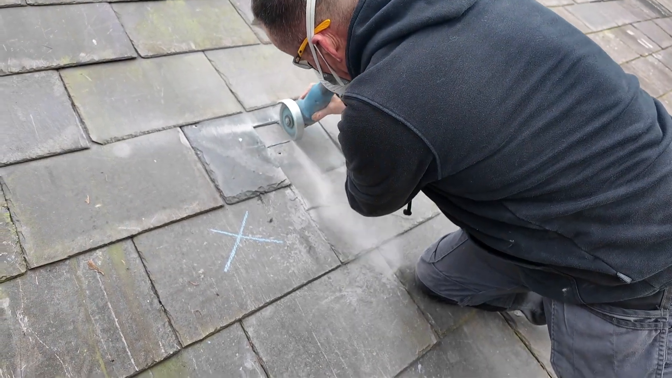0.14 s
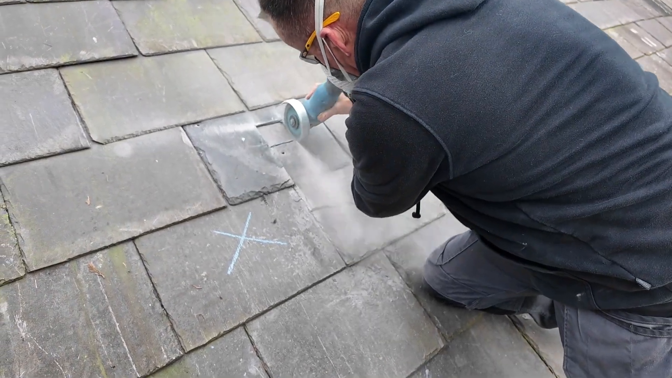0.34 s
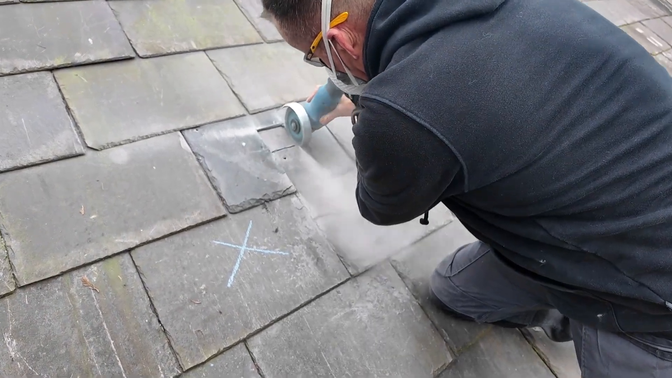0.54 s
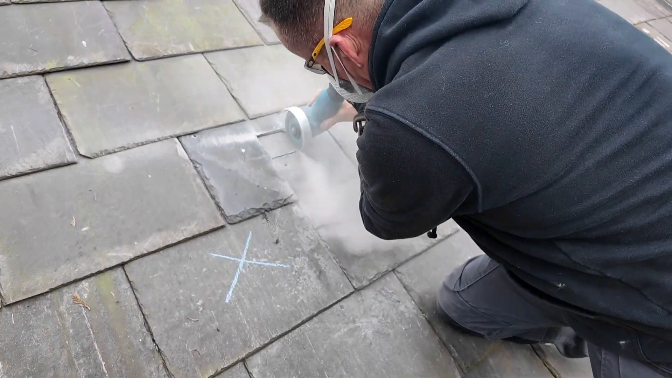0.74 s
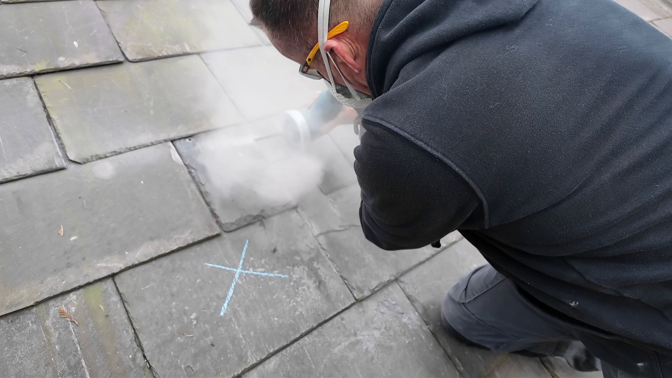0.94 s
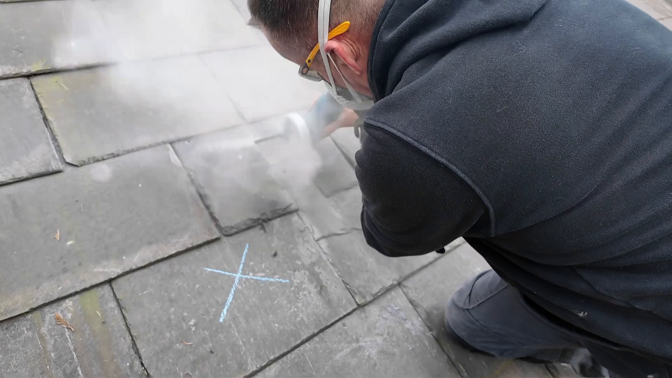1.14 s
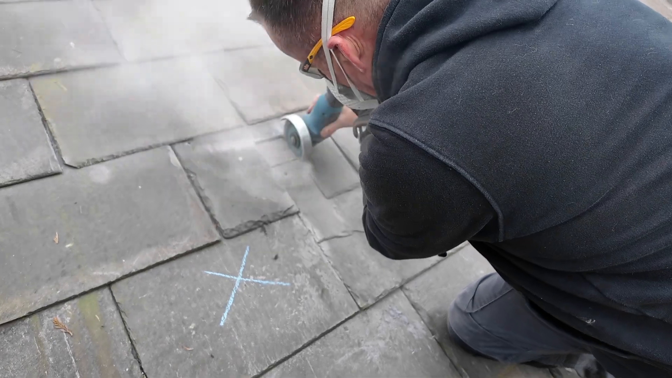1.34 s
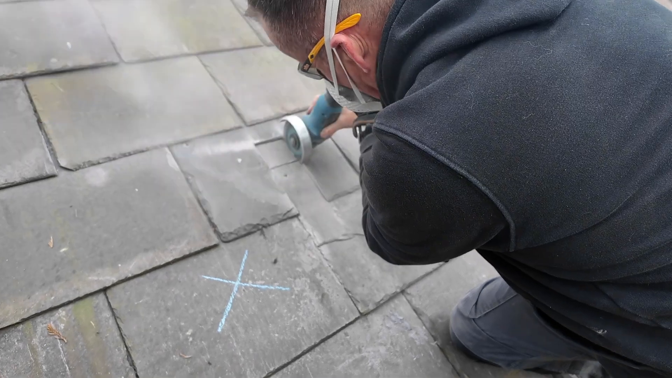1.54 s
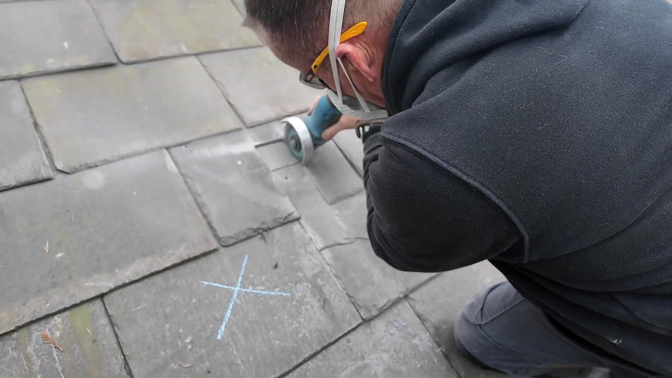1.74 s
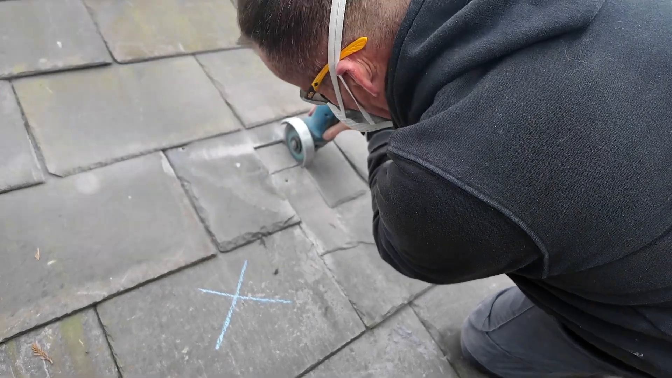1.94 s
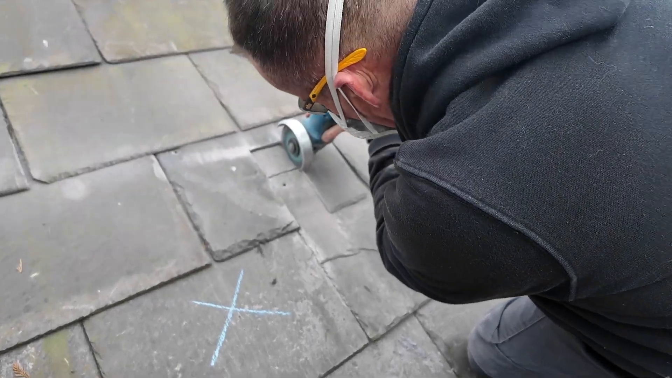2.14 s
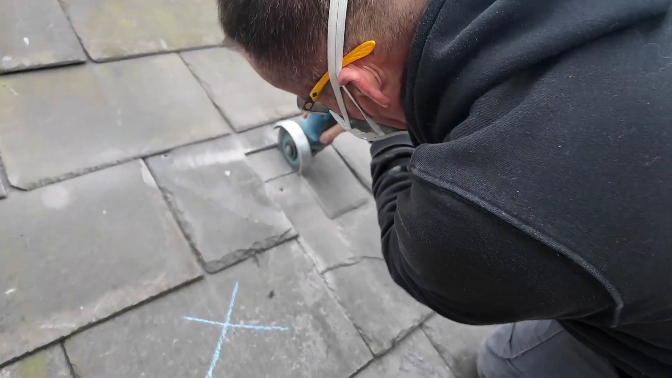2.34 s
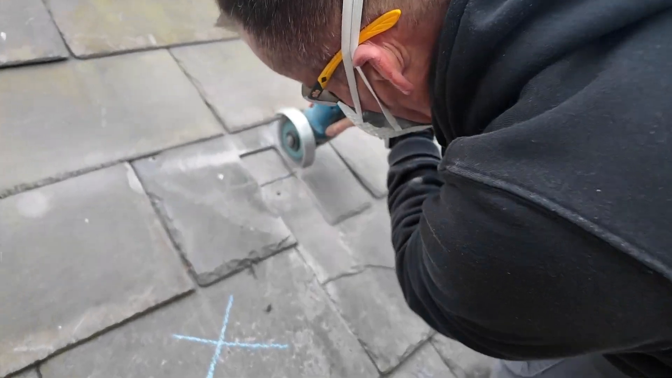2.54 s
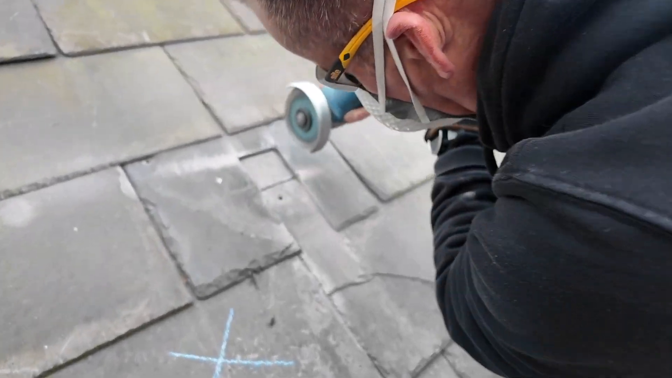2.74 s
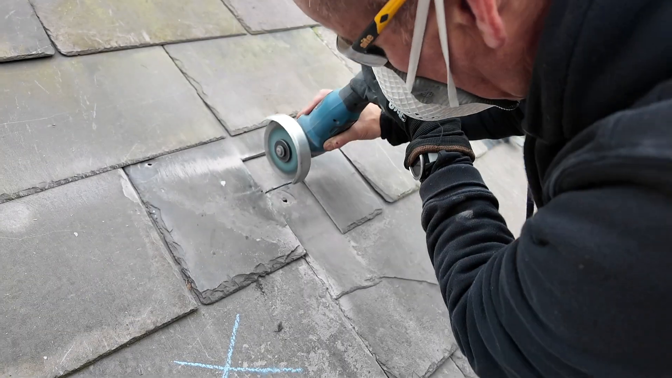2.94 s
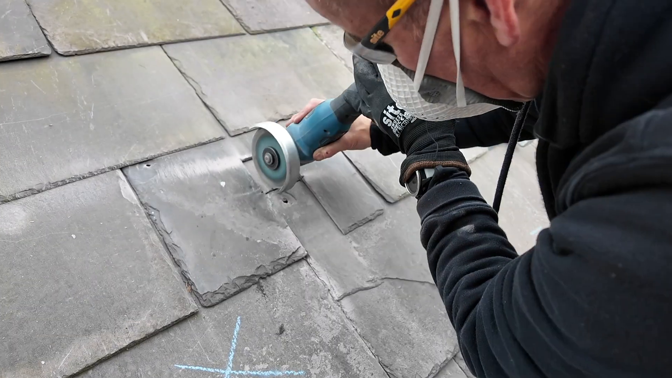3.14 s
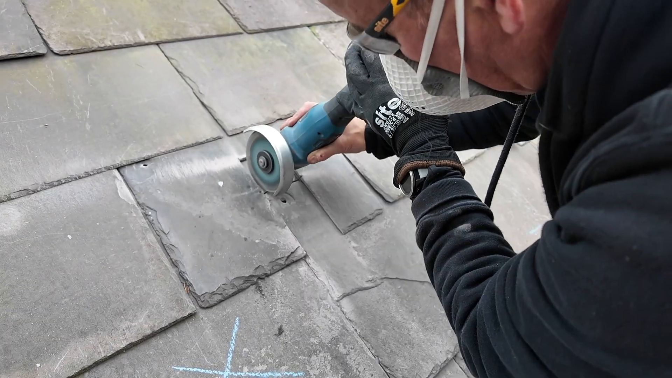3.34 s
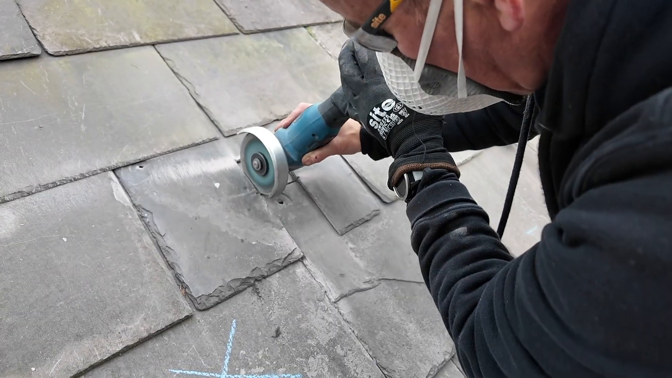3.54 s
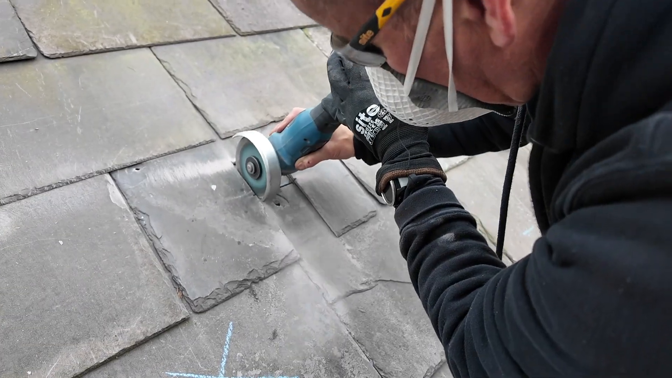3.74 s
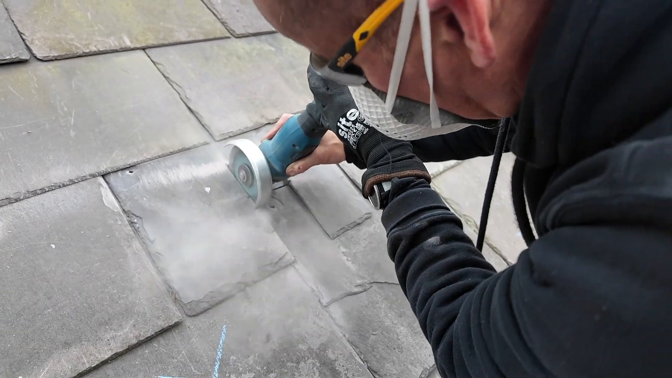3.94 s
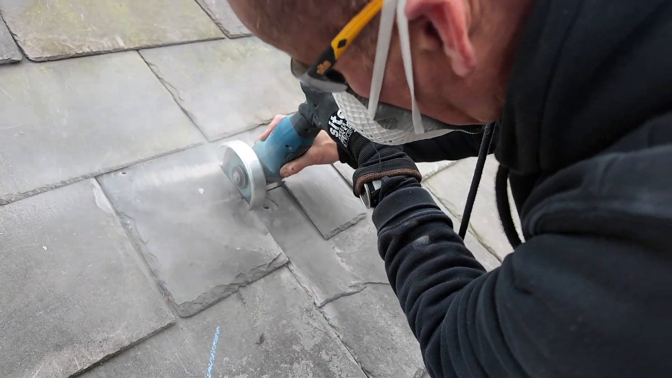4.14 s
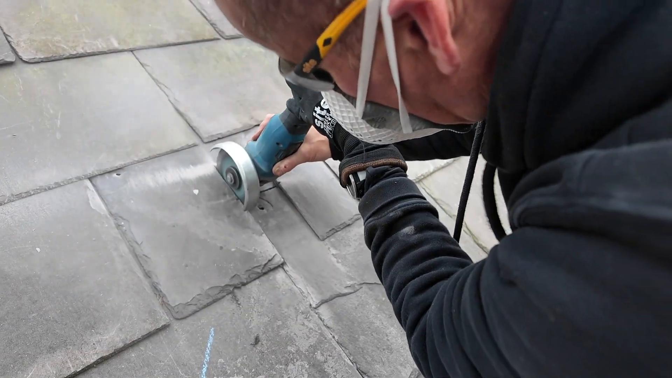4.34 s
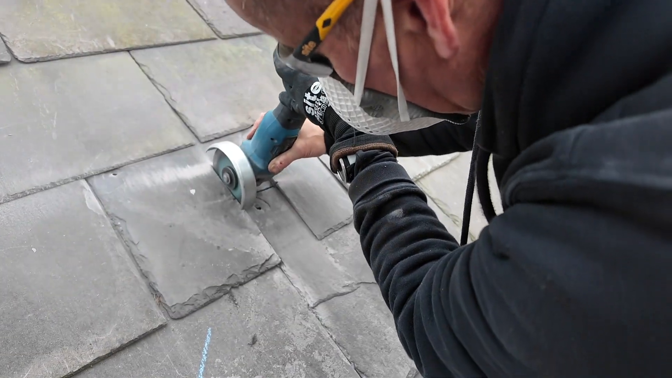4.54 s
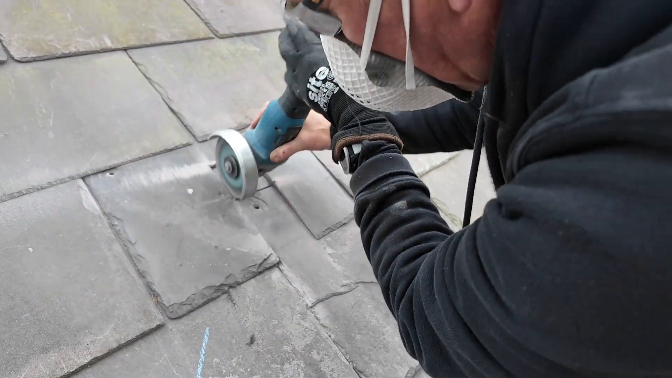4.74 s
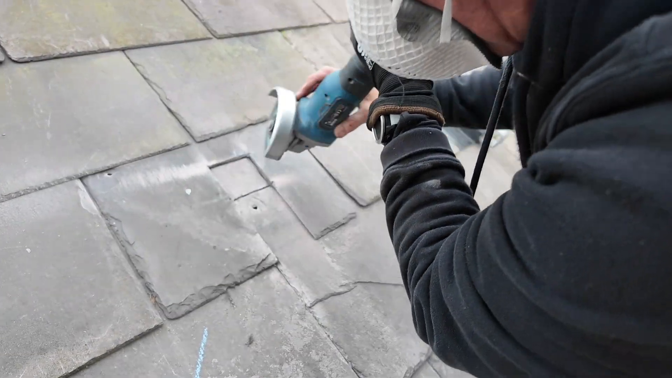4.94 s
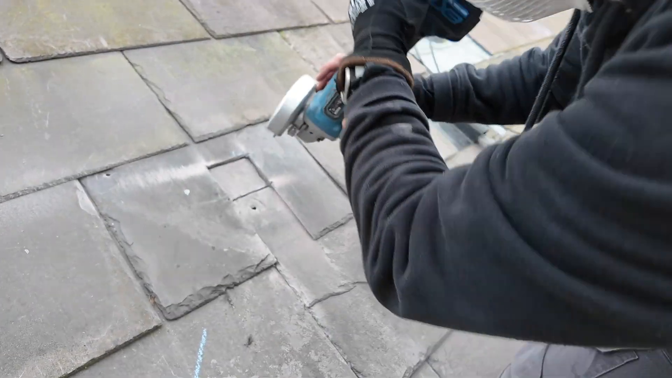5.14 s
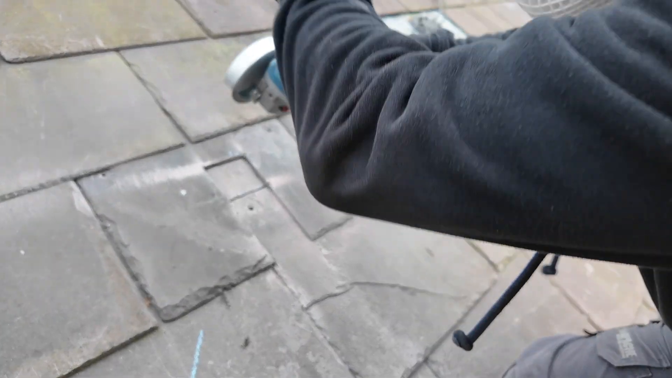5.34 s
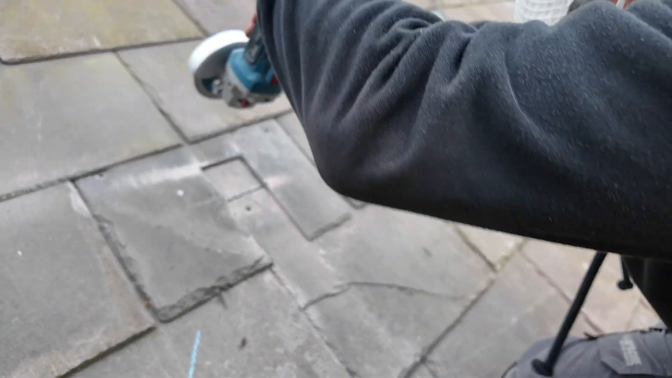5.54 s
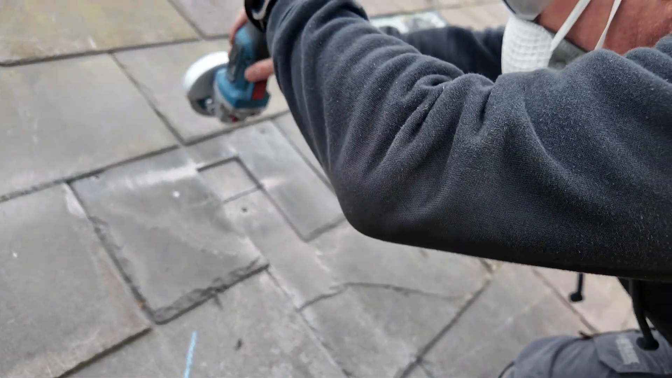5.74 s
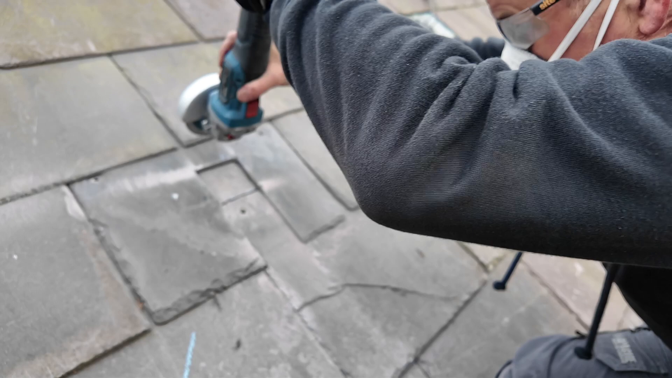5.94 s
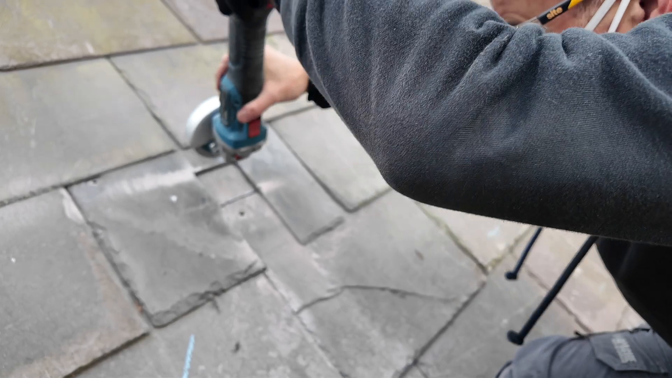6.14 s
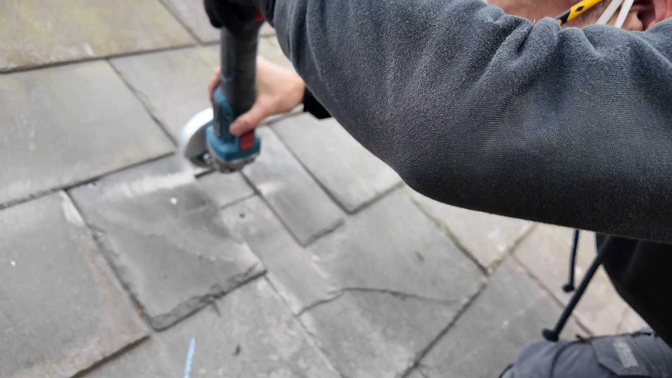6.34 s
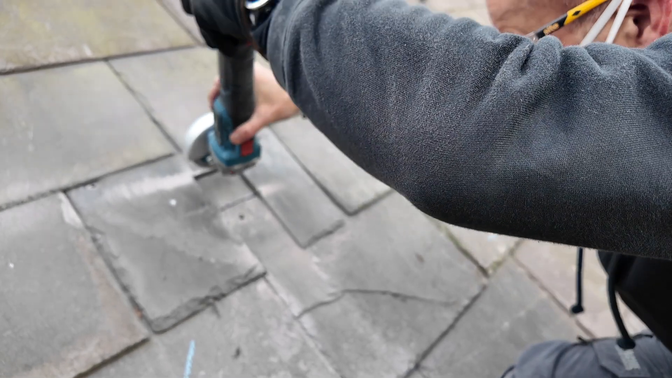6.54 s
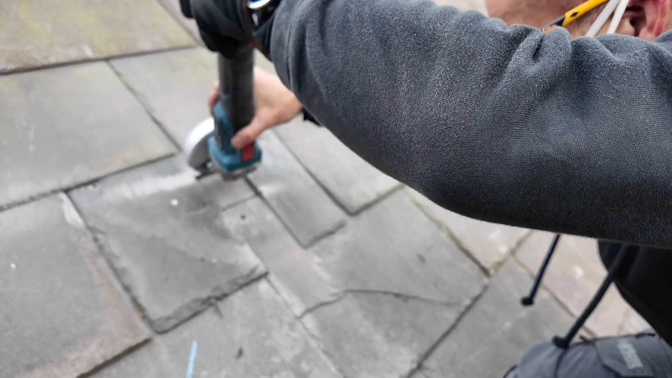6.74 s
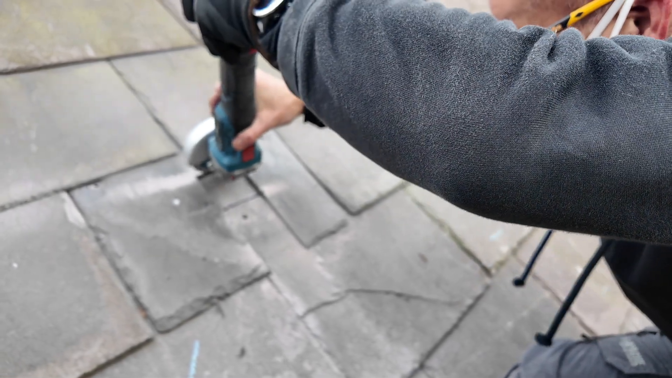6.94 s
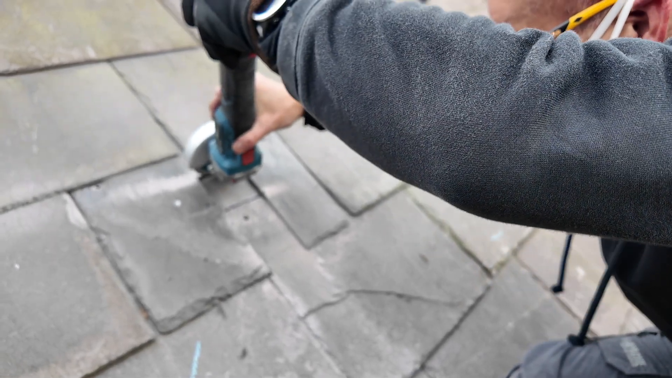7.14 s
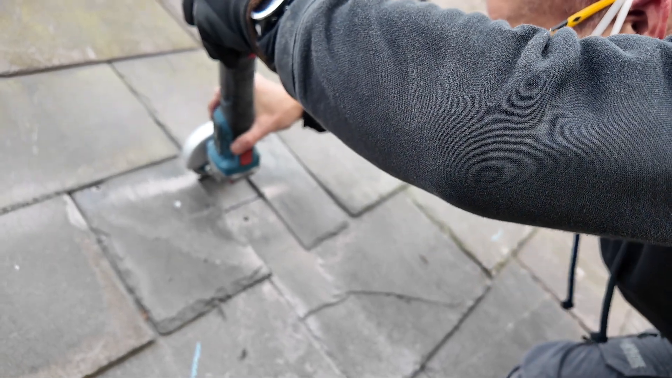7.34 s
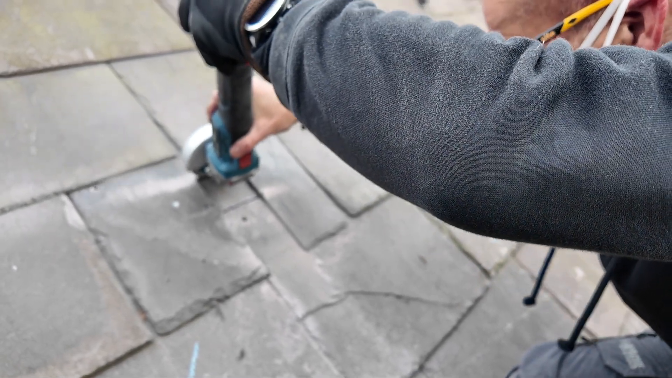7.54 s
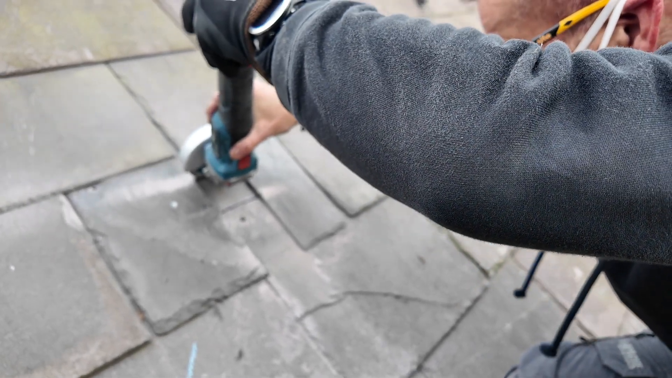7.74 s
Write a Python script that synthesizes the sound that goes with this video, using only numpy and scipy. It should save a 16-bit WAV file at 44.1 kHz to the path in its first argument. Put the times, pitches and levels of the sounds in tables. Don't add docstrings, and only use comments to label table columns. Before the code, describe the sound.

Outdoors on a slate roof, a small angle grinder is already cutting: a loud gritty hiss with metallic ring and a fast buzzing knock that slows as the disc bogs down. It lifts and spins freely with rattling gears, fan air and thin whine, cuts again for about a second, then runs free for longer before bouncing into a third cut. Close camera microphone, dry.

```python
import sys
import numpy as np
from scipy import signal
from scipy.fft import rfft, irfft, next_fast_len
from scipy.io import wavfile
from scipy.ndimage import uniform_filter1d, map_coordinates

SR = 44100
rng = np.random.default_rng(int(sys.argv[2]) if len(sys.argv) > 2 else 0)


def nominal_scale(level):
    x = np.asarray(level, float) / 20
    return 10 ** x


def wav_record(signal):
    frames = np.transpose(np.atleast_2d(signal))
    bounded = np.clip(frames, -1, 1)
    quanta = np.round(bounded * 32767).astype(np.int16)
    wavfile.write(sys.argv[1], SR, quanta)


N = 343539
FREE_HZ = 120.3

# f/Hz, width/Hz, level/dB
DISC_LOW = [(3323, 44, -8), (4244, 108, -3), (4883, 160, -2.5), (5716, 111, 1.5), (6742, 62, 4.5),
            (7510, 59, -6.5)]


def unit(x):
    return x / np.sqrt(np.mean(x ** 2) + 1e-20)


def along(points, hz):
    f, v = np.transpose(points)
    return np.interp(np.log(hz + 1), np.log(f + 1), v)


def curves(rows):
    s, *cols = np.transpose(sorted(map(tuple, rows)))
    return np.array([np.interp(np.arange(N) / SR, s, c) for c in cols])


def wobble(rate):
    knots = rng.standard_normal(int(N * rate / SR) + 4)
    return map_coordinates(knots, [np.arange(N) * rate / SR])


def filtered(x, response):
    m = next_fast_len(N + 8192)
    return irfft(rfft(x, m) * response(np.fft.rfftfreq(m, 1 / SR)), m)[..., :N]


def coloured(x, spectrum):
    return unit(filtered(x, lambda hz: nominal_scale(along(spectrum, hz))))


def wandering(x, depth_db, bins, frames):
    z = signal.stft(x, nperseg=512)[2]
    field = uniform_filter1d(rng.standard_normal(z.shape), size=bins, axis=0)
    field = uniform_filter1d(field, size=frames, axis=1)
    return signal.istft(z * nominal_scale(depth_db * unit(field)), nperseg=512)[1][:N]


def patchy(depth_db):
    return wandering(rng.standard_normal(N), depth_db, bins=6, frames=12)


def drifting(x, depth_db):
    return wandering(x, depth_db, bins=5, frames=25)


def rung(x, modes):
    def bank(f):
        total = 0
        for k, (c, w, db) in enumerate(modes):
            total = total + (-1) ** k * nominal_scale(db) * 1j * f * w / (c * c - f * f + 1j * f * w)
        return total
    return filtered(x, bank) / np.std(filtered(rng.standard_normal(N), bank))


def struck(events, modes):
    out, t = np.zeros(N + SR), np.arange(SR // 2) / SR
    onset = 1 - np.exp(-t / 0.006)
    for s, db in events:
        tail = out[round(s * SR):][:len(t)]
        for hz, g, t60 in modes:
            tail += nominal_scale(db + g - 60 * t / t60) * np.sin(2 * np.pi * hz * t) * onset
    return out[:N]


def tinted(x, rows):
    hz, t, z = signal.stft(x, SR, nperseg=1024, noverlap=768)
    lift = 0
    for a, b, c, w, db in rows:
        peak = db / (1 + (2 * (hz[:, None] - c) / w) ** 2)
        lift = lift + peak * np.clip(np.minimum(t - a, b - t) / 0.017 + .5, 0, 1)
    return signal.istft(z * nominal_scale(lift), SR, nperseg=1024, noverlap=768)[1][:N]


def disc_speed():
    # t/s, f/Hz
    pushes = [
        [(0.0, 113.5), (0.08, 112.2), (0.24, 103.3), (0.4, 106.7), (0.63, 104), (0.77, 101.3), (0.94, 95.64),
         (1.1, 94.35), (1.2, 92.1)],
        [(1.2, 90.46), (1.315, 89.6), (1.41, 98.3), (1.52, 103), (1.71, 111), (1.88, 112.3), (2.05, 105.5),
         (2.13, 107.4)],
        [(2.13, 107), (2.2, 113), (2.37, 111.2), (2.42, 109.7)],
        [(3.7, 120.1), (3.9, 117.1), (3.924, 113.7), (4.03, 109.6), (4.15, 111.6), (4.26, 111), (4.42, 109.5),
         (4.65, 110.7), (4.78, 111.5)],
        [(7.36, 119.9), (7.6, 118.6), (7.66, 118.2), (7.79, 115.2)],
    ]
    spin_up_s = .12
    t, hz = np.arange(N) / SR, np.full(N, FREE_HZ)
    for rows in pushes:
        recovery = np.exp(-np.maximum(t - rows[-1][0], 0) / spin_up_s)
        sag = (FREE_HZ - curves(rows)[0]) * recovery
        hz = np.where(t >= rows[0][0], FREE_HZ - sag, hz)
    return hz


def strokes():
    # from t/s, to t/s, grit level/dB, disc ring level/dB, knock level/dB
    first_cut = [(0, 0.265, -23.5, -28.5, -30.5), (0.229, 0.622, -26.5, -34, -30),
                 (0.627, .72, -24, -29, -30.5), (0.718, 0.993, -23.5, -24.5, -29.5),
                 (1, 1.167, -25.5, -27.5, -29.5), (1.15, 1.448, -24.5, -28.5, -29.5),
                 (1.449, 1.576, -23.5, -27, -32.5), (1.584, 1.72, -26, -30, -38.5),
                 (1.721, 1.793, -24, -24.5, -38), (1.799, 1.911, -26, -31.5, -39.5),
                 (1.897, 2.135, -24, -32, -38.5), (2.134, 2.209, -27.5, -33.5, -49),
                 (2.207, 2.396, -22.5, -30.5, -38.5), (2.39, 2.506, -28, -36.5, -58),
                 (2.513, 2.582, -23.5, -31, -56), (2.58, 2.621, -25, -29.5, -65)]
    later_cuts = [(3.424, 3.441, -17, -42, -27), (3.686, 3.693, -19, -24.5, -60),
                  (3.708, 3.73, -25.5, -35, -41.5), (3.729, 3.784, -33, -39, -50),
                  (3.782, 3.919, -25.5, -26, -43.5), (3.916, 4.025, -20, -28.5, -38.5),
                  (4.015, 4.166, -23.5, -30.5, -37), (4.16, 4.429, -23, -33.5, -36),
                  (4.417, 4.744, -23.5, -30, -36), (4.733, 4.799, -24.5, -27, -42.5),
                  (4.814, 4.859, -21, -26, -48), (7.37, 7.388, -18, -22, -35.5),
                  (7.394, 7.486, -24, -26.5, -46), (7.493, 7.546, -22.5, -26, -45),
                  (7.551, 7.588, -31, -28, -58), (7.614, 7.635, -22.5, -26, -47),
                  (7.636, 7.664, -21, -28, -37.5), (7.671, 7.712, -26, -27, -48),
                  (7.709, 7.778, -23, -26.5, -35)]
    bite_db_per_s, leave_db_per_s = 3000, 1000
    t, db = np.arange(N) / SR, np.full((3, N), -150.)
    for a, b, *levels in first_cut + later_cuts:
        edge = np.maximum(0, np.maximum(bite_db_per_s * (a - t), leave_db_per_s * (t - b)))
        db = np.maximum(db, np.array(levels)[:, None] - edge)
    return nominal_scale(db)


def scrape(turns, repeat):
    textures_per_s = 7
    rim = rng.standard_normal((int(N / SR * textures_per_s) + 3, 401))
    rim[:, -1] = rim[:, 0]
    place = [np.arange(N) / SR * textures_per_s, turns % 1 * 400]
    again = map_coordinates(rim, place, order=1)
    return np.sqrt(repeat) * unit(again) + np.sqrt(1 - repeat) * patchy(1.)


def rim_knocks(turns, drift_db):
    # multiple of disc speed, level/dB as the slot deepens, jams, runs shallow, in later slots
    rim_harmonics = [(1, -21.5, -27, -20, -26), (2, -9, -18, -13, -19), (3, -15, -12.5, -7.5, -15),
                     (4, -14.5, -18, -18, -15.5), (5, -14, -17, -9, -8), (6, -10.5, -16, -9, -17),
                     (7, -14, -12, -24, -12.5), (8, -15.5, -23, -13.5, -15.5), (9, -9, -11, -13.5, -11),
                     (10, -17, -16, -12.5, -15.5), (11, -11, -16, -9.5, -11), (12, -14, -11, -11, -13.5),
                     (13, -17, -6.5, -21, -13.5), (14, -10, -19, -21.5, -35), (15, -14, -8, -17, -12.5),
                     (16, -12, -21, -19, -19), (17, -26, -22, -14, -13), (18, -12, -13, -20, -8.5),
                     (19, -20, -22, -13, -12.5), (20, -23, -14, -9, -9.5), (21, -17, -22, -8, -25),
                     (22, -20, -14, -8, -15.5), (23, -22, -14, -10, -22), (24, -24, -13, -14, -24),
                     (25, -26, -12, -19, -26)]
    slot_changes = [.92, 1.57, 3.0]
    stage = np.searchsorted(slot_changes, np.arange(N) / SR)
    out = np.zeros(N)
    for multiple, *levels in rim_harmonics:
        level = uniform_filter1d(nominal_scale(np.take(levels, stage)), size=2500)
        level = level * nominal_scale(drift_db * (wobble(12) + wobble(45)))
        start = rng.random() * (multiple < 17)
        out += np.sqrt(2) * level * np.sin(2 * np.pi * (round(multiple) * turns + start))
    return out


def slate_cut(turns):
    # t/s, grip/0-1, share of grit repeating each turn/0-1
    slot_depth = [
        (0, 0.48, .5),
        (.4, 0.96, 0.7),
        (.7, 0.89, 0.7),
        (1.1, 0.8, 0.68),
        (1.5, 0.28, 0.55),
        (2.6, 0.08, 0.4),
        (3.7, 0.3, 0.1),
        (4.3, 0.23, 0.5),
        (4.8, 0.16, 0.21),
        (7.79, 0.18, 0.32),
    ]
    # f/Hz, width/Hz, level/dB
    disc_high = [(8440, 85, 3.5), (8865, 63, 3.5), (10050, 40, 0), (11380, 74, -4), (11900, 120, -10.5),
                 (12900, 130, -40), (13400, 53, -22), (13700, 67, -33), (14400, 160, -27), (14800, 66, -59),
                 (15500, 94, -33)]
    # f/Hz, level/dB per Hz
    buried_grit = [(880, -25), (1500, -7), (1610, -65), (1740, -7), (2010, -34), (2730, -2.5), (3010, 6.5),
                   (4720, 2.5), (5370, 0), (6730, 1.5), (7870, -1), (8680, -5), (9480, -8.5), (11900, -7.5),
                   (15600, -18.5)]
    # f/Hz, level/dB per Hz
    crumble = [(47, -49), (80, -16), (145, -50), (206, -12), (242, -4.5), (788, -9), (924, -3), (1070, -7),
               (2600, 3), (3380, -29), (5720, -120)]
    # from t/s, to t/s, f/Hz, width/Hz,
    # level/dB
    cut_tints = [(0.4, 0.874, 915, 82, 11), (2, 1.5, 2700, 280, 1), (1, 1.22, 6000, 650, 5),
                 (-0.5, 1.55, 2560, 280, 8), (1.4, 2.77, 5660, 146, -4), (1.1, 1.83, 5000, 230, 1.5),
                 (1.5, 2.4, 116, 170, 2.5), (3, 4.3, 1070, 160, 8.5), (3.5, 4.15, 204.2, 60, 3),
                 (7, 7.79, 210, 67, 5), (0.9, 1.5, 4480, 240, 7), (0.5, 1.4, 10050, 100, -7),
                 (1.5, 1.7, 5750, 300, -3), (4, 4.82, 340, 32, 9), (2.5, 3.4, 3600, 98, 6),
                 (.23, 0.462, 950, 74, 10), (1.06, 1.6, 1370, 280, 3.5), (8, 7.79, 6900, 200, -20),
                 (7.5, 7.79, 6720, 120, 5), (-2, .7, 15300, 900, 5), (4, 5, 6728, 267, -9),
                 (7, 9.2, 12140, 2100, -7.5), (7.5, 8.8, 151, 120, 10),
                 (-0.5, .7, 5400, 220, -6), (1, 1.494, 7030, 273, -4), (-0.5, 0.67, 2560, 470, -3.5),
                  (-7, 0.25, 4260, 90, -5.5), (1.5, 1.445, 4910, 100, -6), (1.15, 3, 5190, 260, -8.5),
                  (1, 2.62, 6000, 270, -3), (3, 2.8, 2500, 110, 0), (-0.5, 2.1, 5100, 82, 7),
                  (2.5, 2.62, 5690, 150, 9), (1, 2.2, 4560, 200, 3), (1.5, 2.34, 2500, 320, 5.5),
                  (-0.2, 0.834, 3730, 220, 5), (0.8, 1.1, 2956, 330, 3.5), (0, 1.46, 6560, 81, 7),
                  (2.5, 2.63, 4300, 200, 6), (2, 2.52, 2900, 123, 5), (3.5, 4.05, 4200, 150, 5),
                  (4.3, 4.86, 4930, 112, 4.5), (3, 3.46, 14000, 12000, -12),
                 (7.628, 7.68, 1295, 110, 20), (7.71, 7.79, 1295, 110, 14), (7.62, 7.79, 1520, 150, -9),
                  (7.62, 7.79, 1060, 120, -6), (7.38, 7.575, 985, 90, 12), (7.38, 7.575, 720, 90, 8),
                  (7.39, 7.62, 1900, 600, -5), (7.38, 7.56, 4250, 250, 4), (1.5, 2.5, 3280, 200, -5),
                  (1.13, 1.31, 4550, 350, 5), (1.96, 2.5, 3560, 200, 9), (3.9, 3.985, 2050, 130, 12),
                  (3.4, 3.465, 4200, 250, 6), (3.4, 3.465, 238, 90, 17), (3.71, 3.93, 232, 120, 19),
                  (3.67, 3.9, 4250, 200, 4), (3.7, 3.76, 1070, 150, 10)]
    thin_rim = [(0, 7.79, hz, 150, 8) for hz in (13420, 13730, 14800, 15600)]
    # t/s, level/dB
    lifts = [
        (2.625, -43),
        (3.445, -43),
        (4.865, -41),
        (7.55, -42),
    ]
    # f/Hz, level/dB, t60/s
    free_ring = [(4350, -8, 0.17), (5609, -12, 0.08), (7560, -6, 0.3), (8470, 3, 0.22), (8865, 3, 0.3)]
    hand = nominal_scale([[1], [2], [.5]] * np.array([wobble(13), wobble(14), wobble(14)]))
    grit, ring, knock = uniform_filter1d(strokes(), size=90, axis=1) * hand
    grip, repeat = np.clip(curves(slot_depth), 0, 1)
    uneven_rim = 1 + 0.14 * np.cos(2 * np.pi * turns)
    bite = uneven_rim * nominal_scale(0.088 * wobble(30) + 0.3 * wobble(90))
    hiss = np.sqrt(grip) * grit * coloured(bite * scrape(turns, repeat), buried_grit)
    low = rung(np.sqrt(1 - grip) * grit * bite * scrape(turns, repeat), DISC_LOW)
    high = nominal_scale(-3.0) * rung(np.sqrt(1 - grip) * ring * bite * patchy(1.0), disc_high)
    crumbling = nominal_scale(-13.5) * coloured(patchy(2.), crumble)
    slate = knock * (nominal_scale(-4) * rim_knocks(turns, drift_db=1.6) + crumbling)
    sawing = hiss + drifting(low + high, 0.74) + slate
    return tinted(sawing, cut_tints + thin_rim) + struck(lifts, free_ring)


def let_through(hz):
    # from t/s, to t/s, held down level/dB, recovery/s, whine against rattle level/dB
    clear_runs = [
        (2.64, 3.42, 11, .2, -14),
        (3.46, 3.68, 4, .3, -13),
        (4.88, 7.37, 10.5, .42, -20),
    ]
    under_cut_db, free_db = -34.5, -25
    air_db, whine_level_db, whine_db_per_hz = -16, -30, 1.2
    near_s, near_db = 0.02, 3
    tip_s, tip_air_db, tip_whine_db = (6.53, 7.36), 3, -15
    t = np.arange(N) / SR
    rattle, thin = np.full(N, under_cut_db, float), np.full(N, whine_level_db, float)
    for a, b, held_db, recovery, whine_db in clear_runs:
        held = held_db * np.exp(-np.abs(t - a) / recovery)
        near = near_db * np.exp(-np.abs(b - t) / near_s)
        rattle = np.where((t >= a) & (t < b), free_db - held + near, rattle)
        thin = np.where((t >= a - .18) & (t < b + .1), whine_db, thin)
    rattle, thin = uniform_filter1d([rattle, thin], size=900, axis=1)
    tipped = np.interp(t, tip_s, [0, 1]) * (t < tip_s[1])
    whine = rattle + thin + tip_whine_db * tipped - whine_db_per_hz * (FREE_HZ - hz)
    return rattle, rattle + air_db + tip_air_db * tipped, uniform_filter1d(whine, size=6000)


def tooth_blows():
    # t/s,
    # peak level/dB
    hard_clacks = [(2.693, -21), (2.712, -24), (2.728, -23), (2.743, -22), (2.762, -21), (2.778, -22),
                   (2.794, -18), (2.806, -21), (2.83, -16), (2.846, -21), (2.856, -19), (2.863, -20),
                   (2.881, -17), (2.907, -19), (2.914, -21), (2.931, -20), (2.946, -16), (2.962, -19),
                   (2.983, -17), (3.016, -18), (3.03, -16), (3.046, -14), (3.064, -18), (3.086, -17),
                   (3.103, -15), (3.14, -19), (3.154, -17), (3.17, -16), (3.187, -16), (3.205, -14),
                   (3.22, -15), (3.236, -15), (3.256, -16), (3.281, -17), (3.304, -14), (3.321, -16),
                   (3.338, -14), (3.354, -16), (3.371, -15), (3.385, -13), (3.405, -17), (3.48, -15),
                   (3.506, -18), (3.52, -19), (3.539, -17), (3.556, -21), (3.571, -15), (3.587, -18),
                   (3.606, -16), (3.614, -19), (3.625, -17), (3.635, -17), (3.655, -16),
                   (4.961, -22), (4.977, -23), (4.994, -22), (5.011, -21), (5.029, -22), (5.044, -20),
              (5.062, -21), (5.079, -21), (5.095, -19), (5.112, -21), (5.128, -20), (5.142, -19),
              (5.163, -20), (5.187, -19), (5.198, -18), (5.214, -18), (5.23, -15), (5.246, -19),
              (5.269, -21), (5.28, -19), (5.307, -16), (5.322, -16), (5.338, -18), (5.367, -17),
              (5.403, -18), (5.42, -18), (5.455, -18), (5.472, -18), (5.488, -16), (5.513, -18),
              (5.529, -17), (5.547, -12), (5.563, -16), (5.605, -16), (5.622, -16), (5.637, -14),
              (5.673, -17), (5.697, -14), (5.723, -15), (5.741, -15),
                   (5.766, -17), (5.781, -15), (5.804, -15), (5.818, -13), (5.84, -15), (5.855, -16),
             (5.872, -13), (5.889, -15), (5.904, -17), (5.921, -15), (5.947, -14), (5.98, -14),
             (5.997, -13), (6.022, -14), (6.038, -16), (6.055, -13), (6.071, -12), (6.088, -15),
             (6.106, -16), (6.12, -14), (6.135, -13), (6.155, -13), (6.164, -11), (6.179, -12),
             (6.205, -11), (6.221, -17), (6.24, -14), (6.246, -15), (6.263, -16), (6.279, -12),
             (6.321, -15), (6.337, -17), (6.354, -13), (6.379, -15), (6.396, -13), (6.411, -13),
             (6.428, -14), (6.454, -14), (6.474, -15), (6.504, -15), (6.52, -13), (6.537, -15),
                   (6.555, -13), (6.588, -16), (6.603, -13), (6.618, -15), (6.636, -13), (6.662, -15),
               (6.695, -15), (6.712, -16), (6.73, -17), (6.772, -14), (6.786, -15), (6.819, -14),
               (6.837, -13), (6.86, -14), (6.881, -14), (6.894, -16), (6.923, -15), (6.938, -15),
               (6.981, -15), (7.002, -12), (7.018, -14), (7.045, -15), (7.071, -16), (7.087, -14),
               (7.102, -13), (7.119, -15), (7.146, -16), (7.169, -16), (7.187, -15), (7.229, -14),
               (7.253, -13), (7.28, -14), (7.295, -14), (7.311, -14), (7.329, -11)]
    s, db = np.transpose(hard_clacks)
    return np.bincount(((s - .001) * SR).astype(int), nominal_scale(db), N)


def clack_envelope(t60):
    decay = nominal_scale(-60 * np.arange(SR // 10) / SR / t60)
    return uniform_filter1d(np.abs(signal.fftconvolve(tooth_blows(), decay)[:N]), size=110)


def steady(x):
    return x / np.sqrt(np.abs(uniform_filter1d(x * x, size=60)) + 0.0091)


def free_motor(turns):
    # f/Hz, level/dB per Hz
    tooth = [(1500, -24), (3000, -6.5), (4500, -5.5), (5300, 0.5), (6800, -5), (7500, -8), (10000, -12),
             (15600, -35)]
    # f/Hz, level/dB
    muffle = [(6800, 0), (7600, -3), (9000, -9), (10100, -4), (15600, -8)]
    # f/Hz, width/Hz, level/dB
    guard_modes = [(3030, 130, -9), (4100, 100, -4), (4450, 120, -12), (5170, 110, 0), (5600, 90, -4),
                   (6070, 300, -7), (6680, 80, -6)]
    # f/Hz, level/dB per Hz
    gearbox = [(880, -56), (1500, -16.5), (1620, -30), (1750, -27), (1810, -13.5), (2260, -13), (3040, -2),
               (3250, -8.5), (4040, -3.5), (4680, -7), (5260, 0), (6590, 0), (7420, -17), (9760, -19),
               (15600, -35)]
    # f/Hz, level/dB per Hz
    fan = [(15, -61), (25, -39.5), (308, -9.5), (393, -12), (676, -3.5), (831, -10.5), (1330, -7.5),
           (1570, -19), (1690, -7), (1820, -28), (2200, -7.5), (2860, -8.5), (4840, -120)]
    # multiple of disc speed, level/dB
    whine_tones = [(14.22, -3.5), (28.44, -8.5), (31.0, -2), (42.66, -0.5), (56.88, -66)]
    # from t/s, to t/s, f/Hz,
    # width/Hz, level/dB
    pose = [(2.751, 3.419, 10600, 300, -4), (2.753, 3.698, 2370, 610, -6.5), (2.85, 3.648, 556, 250, 3),
            (3.107, 3.7, 7960, 900, 3), (4.999, 5.348, 3790, 300, 10.5), (5.0, 5.506, 7960, 796, 4),
            (5.307, 5.84, 1380, 299.6, 10), (5.805, 6.597, 2287, 396.3, 5.5), (6.1, 7.361, 966, 79.8, 8),
            (2.705, 3.701, 978, 150, 5.5),
            (2.78, 3.42, 10100, 450, 9), (2.7, 3.42, 9050, 500, -4)]
    clack_t60_s, guard_t60_s = .018, .03
    clack_db, guard_db, bead_db = -4.5, -6.5, 7
    rattle_db, air_db, whine_db = let_through(np.gradient(turns) * SR)

    turn = turns.astype(int)
    draw = rng.random((turn[-1] + 2, 2))[turn]
    since = (turns % 1 - 0.41 * draw[:, 1]) / 120
    light = nominal_scale(5 * draw[:, 0] - 60 * np.abs(since) / 0.017) * (since > 0)
    light = uniform_filter1d(light, size=40)

    facing = np.clip((np.arange(N) / SR - 6.0) / 0.33, 0, 1)
    guard = nominal_scale(guard_db) * (.4 + .6 * facing) * rung(clack_envelope(guard_t60_s) * patchy(1.0), guard_modes)
    guard = guard + nominal_scale(bead_db) * (.6 + .4 * facing) * rung(tooth_blows(), guard_modes[1:4])
    hard = nominal_scale(clack_db - 5.2 * facing) * clack_envelope(clack_t60_s) * steady(coloured(patchy(0.77), tooth))
    hard = filtered(hard, lambda hz: nominal_scale(along(muffle, hz)))

    disc = nominal_scale(-12) * rung(unit(0.047 + light) * patchy(1.2), DISC_LOW)
    gear_hiss = nominal_scale(-4.5) * coloured(nominal_scale(0.45 * wobble(25)) * patchy(1.9), gearbox)
    gears = disc + gear_hiss + nominal_scale(-11) * coloured(light * patchy(1.2), tooth)
    air = nominal_scale(air_db + 1.5) * coloured(patchy(1.5), fan)
    rush = nominal_scale(rattle_db + .8 * wobble(55)) * gears + air + hard + guard
    whine = np.zeros(N)
    for k, db in whine_tones:
        phase = 2 * np.pi * k * turns + .022 * k * wobble(20)
        whine += nominal_scale(db + .8 * wobble(6)) * np.sin(phase)
    return tinted(rush, pose) + nominal_scale(whine_db) * whine


def knee_thumps():
    # t/s, peak level/dB, f/Hz
    thumps = [
        (5.229, -45, 125),
        (6.578, -42, 124.7),
        (7.335, -43, 121.1),
    ]
    return sum(struck([(s, db)], [(hz, 2.5, .15)]) for s, db, hz in thumps)


def scene():
    turns = np.cumsum(disc_speed()) / SR
    return np.tile(slate_cut(turns) + free_motor(turns) + knee_thumps(), (2, 1))


def band_limit(x):
    return signal.sosfilt(signal.butter(12, 15780, fs=SR, output="sos"), x)


def record(dry):
    thin = filtered(dry, lambda hz: (1j * hz / (45 + 1j * hz)) ** 2 * (hz < 15780))
    rounded = thin / np.sqrt(np.sqrt(1 + (thin / .55) ** 4))
    return band_limit(rounded)


dry = scene()
out = record(dry)
wav_record(out)
```